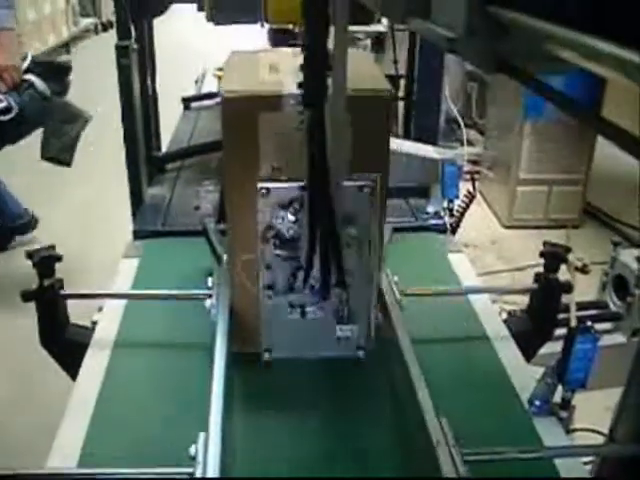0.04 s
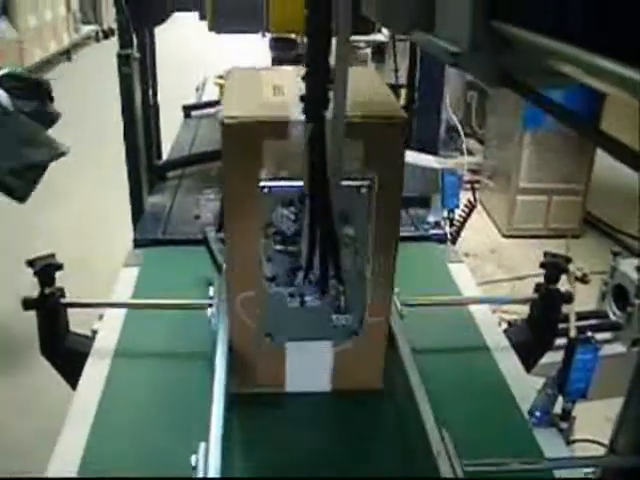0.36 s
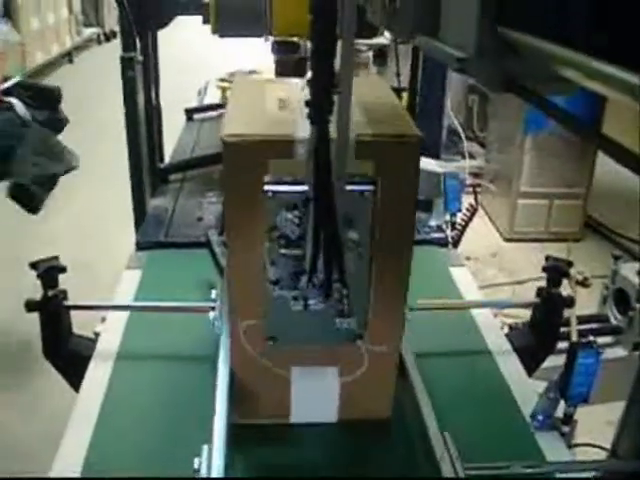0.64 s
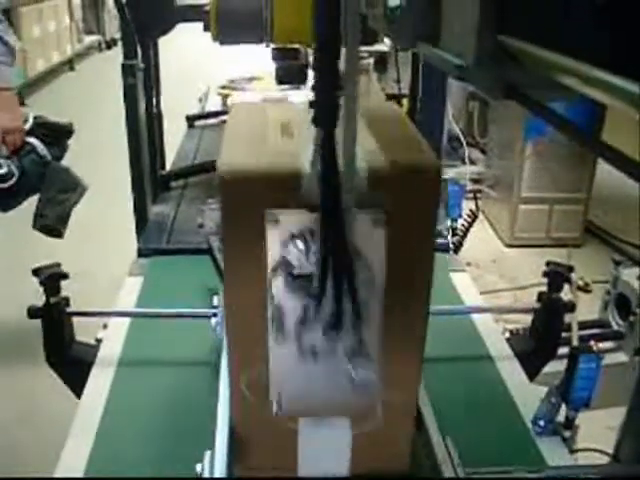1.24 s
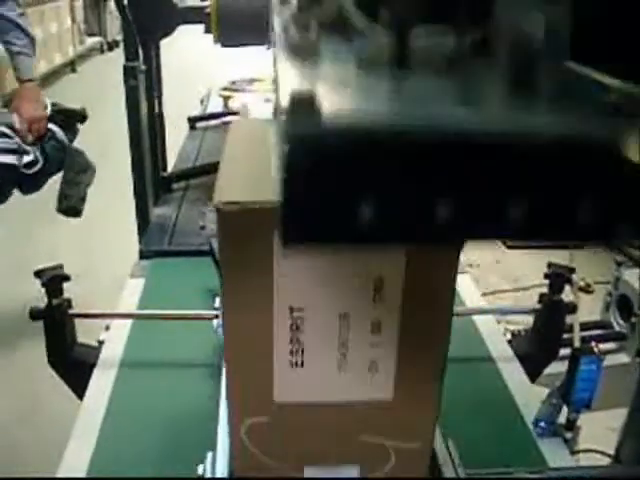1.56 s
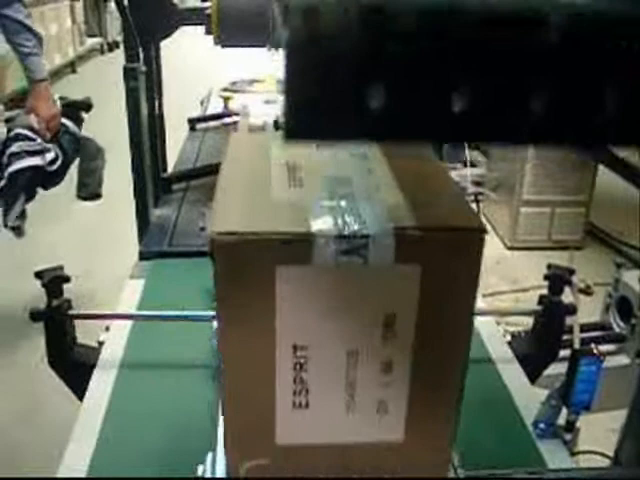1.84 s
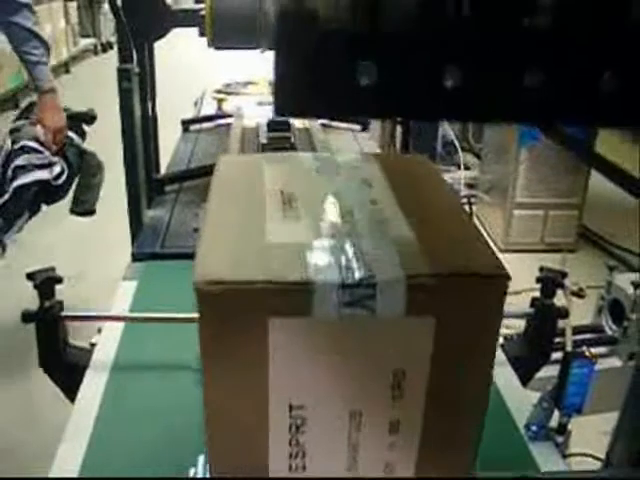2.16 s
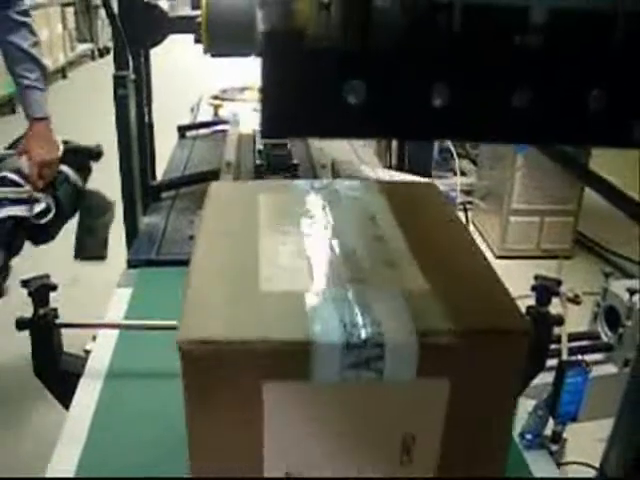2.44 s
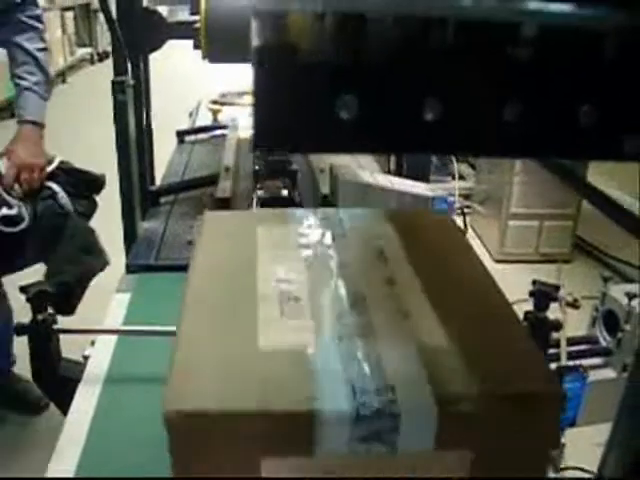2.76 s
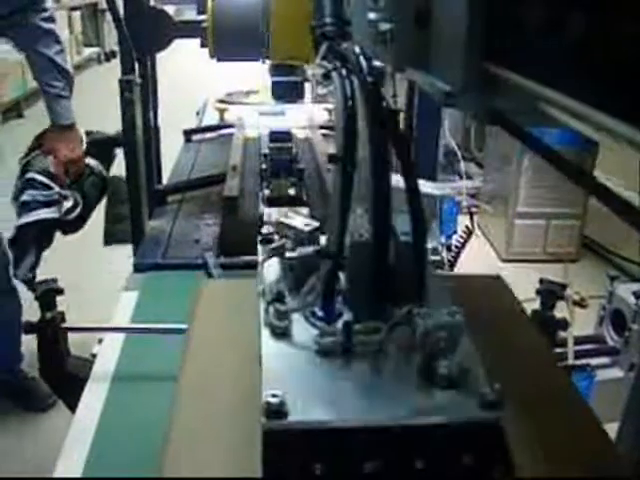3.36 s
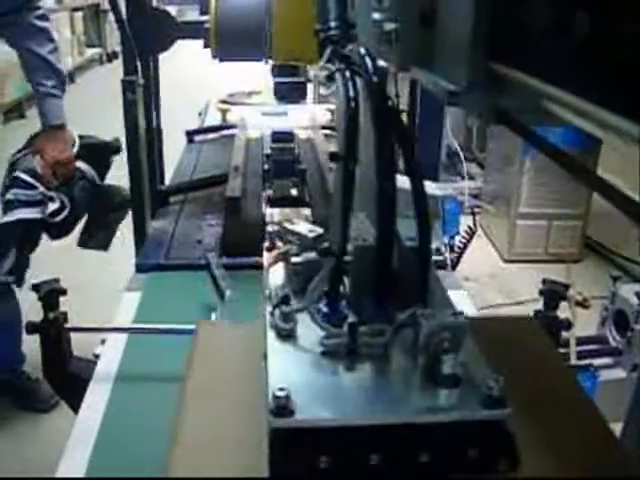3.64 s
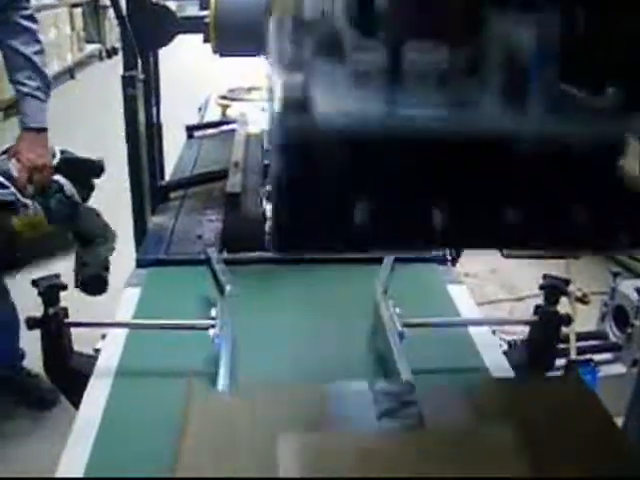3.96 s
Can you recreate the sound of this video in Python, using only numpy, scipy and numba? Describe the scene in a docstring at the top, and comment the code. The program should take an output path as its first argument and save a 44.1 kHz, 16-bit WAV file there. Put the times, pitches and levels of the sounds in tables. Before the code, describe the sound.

A pneumatic labeller clacks and fires a short air blast over a whirring conveyor. A longer hiss follows with a high motor whine, then a heavy knock, another blast and metallic clacks, sounding gritty through a small microphone.

```python
"""A conveyor whirrs and rumbles, carrying a carton past a pneumatic labeller. Twice the arm swings out,
knocks and blows a label on with a blast of turbulent air; each knock rings the modes of carton, frame and
metal stop. In between, an air jet hisses while the printer's stepper motor whines, feeding the next label.
The jets push down a small camera's gain control, and its coarse sampling adds a gritty treble."""
import sys
import numpy as np
from scipy import signal
from scipy.fft import rfft, irfft
from scipy.io import wavfile
from scipy.ndimage import uniform_filter1d
from numba import njit

SR = 44100
rng = np.random.default_rng(int(sys.argv[2]) if len(sys.argv) > 2 else 0)


def int16_out(signal):
    """Quantize to a 16-bit WAV file."""
    q = np.round(np.clip(np.atleast_2d(signal).T, -1, 1) * 32767)
    wavfile.write(sys.argv[1], SR, q.astype(np.int16))


N = 176400
T = np.arange(N) / SR
FREQS = np.maximum(np.arange(N // 2 + 1) * SR / N, 1)


# Label blasts. Each row: start and end in seconds, hiss and sizzle in dB, hiss tilt in dB per octave.
BLASTS = [(0.978, 1.182, -6.5, -6.5, 0), (3.617, 3.817, -4.5, -6, -2)]
# Spectra of the hiss and of the top-octave sizzle. Each row: frequency in Hz, relative level in dB.
BLAST_HISS = [(30, -24), (350, -26.5), (700, -32.5), (1100, -9.5), (1600, -11.5), (2050, 2), (2550, 3.5),
              (3400, 3), (4200, 7)]
SIZZLE = [(7000, -80), (10000, 0), (18000, 0)]
AIR_FLUTTER_DB = 0.57

def label_blasts(open_s=0.009, close_s=0.0088):
    """Turbulence radiates broadband noise while a valve is open, and decays once it shuts."""
    out = np.zeros(N)
    for start, end, hiss_db, sizzle_db, tilt_db in BLASTS:
        valve = np.clip((T - start) / open_s, 0, 1) * np.exp(-np.maximum(T - end, 0) / close_s)
        hiss = from_db(hiss_db) * noise(BLAST_HISS, tilt_db)
        out += valve * (hiss + from_db(sizzle_db) * noise(SIZZLE))
    return out * flutter(AIR_FLUTTER_DB)


# Jet that carries the fresh label under the pad. Each row: time in seconds, level in dB.
FEED_FLOW = [(1.828, -43), (1.833, -5.5), (2.1, 0.5), (2.4, -2), (2.74, -3), (2.79, -9.5), (2.83, -14.5),
             (2.9, -42)]
# Spectrum of its hiss. Each row: frequency in Hz, relative level in dB.
FEED_HISS = [(30, 2), (70, 3), (130, -1), (240, -7), (350, -12), (1050, -7.5), (1550, -11), (2100, -4),
             (2700, -3), (3500, 2), (4200, 2)]

def feed_jet():
    """Turbulent noise rises and falls with the flow of a softer jet buffeting the label."""
    hiss = from_db(-10.5) * noise(FEED_HISS) * flutter(AIR_FLUTTER_DB)
    sizzle = from_db(-9.5) * noise(SIZZLE)
    return airflow(FEED_FLOW) * (hiss + sizzle)


# Impacts of the arm and its valves. Each row: start in seconds, levels of carton thud, frame clack,
# metal ring and crack in dB, rattle time constant in seconds, hardness in dB per octave.
IMPACTS = [(0.837, -17.5, -33, -43, -40, 0.0034, 7.5), (.890, -36, -18.5, -22, -36, .004, -11),
           (0.9748, -23, 0.5, -9.5, -4, 0.0011, 10), (1.180, -5, -30, -30, -32, 0.0031, -7),
           (1.229, -22, -10.5, -19, -28, .005, 4.5), (1.4769, -24, -13.5, -21, -18.5, 0.0078, 4),
           (1.566, -30, -25, -7, -15, 0.0034, 0), (1.574, -29, -16, -18, -16, 0.0032, -3),
           (1.5815, -32, -10.5, -21, -18, .005, -10), (1.8279, -1, -7.5, -32, -9.5, 0.0019, -4.5),
           (2.761, -14, -6, -13, -11.5, 0.0037, -15), (2.814, -8, -7, -33, -29, 0.0039, -4),
           (2.9705, 0, -10.5, -16, -13, 0.004, 1), (3.3023, 10, 16.5, -13, -1, 0.0062, 1.5),
           (3.3073, 0, 2, -21, -4.5, .004, 11), (3.3247, -20, -5.5, -3.5, -4, .002, -2),
           (3.362, -17, -21, -20, -31, .002, 15), (3.6147, -3, 10, -0.5, -0.5, 0.0016, -8),
           (3.9081, -19, -2, 5.5, 3, 0.0025, 8.5), (3.9228, -18, -7.5, 10, 13.5, 0.0014, 5)]
# Modes of the struck parts. Each row: frequency in Hz, relative level in dB, T60 in seconds.
CARTON_MODES = [(98, -8.5, 0.065), (141, -2, 0.055), (269, -1, 0.024)]
FRAME_MODES = [(518, -2.5, 0.01), (736, -3, 0.015), (1060, -2, 0.012), (1360, -11, 0.0082),
               (1773, -7, 0.007)]
STOP_MODES = [(2176, -6, 0.01), (2476, 5, 0.0094), (2750, 0, 0.013), (3430, -3, 0.014),
              (3900, -2.5, 0.0026)]

def impacts(rattle_share=0.89):
    """An impulse excites damped modes in each part; frame and metal stop also rattle briefly."""
    out, age = np.zeros(N), T[:SR // 20]
    parts = (CARTON_MODES, 0), (FRAME_MODES, rattle_share / 2), (STOP_MODES, rattle_share)
    for part, (modes, rattle) in enumerate(parts):
        for k, (hz, db, t60) in enumerate(modes):
            force = np.zeros(N + SR)
            octaves = np.log2(hz / modes[1][0])  # harder blows favour the higher modes
            for start, *levels_db, _, rattle_s, hardness_db in IMPACTS:
                contact = rng.standard_normal(len(age)) * np.exp(-age / rattle_s)
                contact *= rattle / np.linalg.norm(contact)
                contact[0] += 1  # the impulse
                onset = int(start * SR)
                strength = from_db(levels_db[part] + hardness_db * octaves)
                force[onset:onset + len(age)] += strength * contact
            out += (-1) ** k * from_db(db) * damped_mode(force[:N], hz, t60)
    return out


def cracks():
    """Each abrupt contact radiates a dry burst of noise that decays exponentially."""
    envelope = sum((T >= start) * from_db(db) * np.exp(-np.abs(T - start) / rattle_s)
                   for start, *_, db, rattle_s, _ in IMPACTS)
    grit = butter(rng.standard_normal(N), 510, "high", order=1)
    grit = butter(grit, 4500, "low", order=4)
    return envelope * grit / grit.std()


# The printer's motor. Each row: time in seconds, step rate in Hz, level in dB.
STEPPER = [(2.03, 2040, -54), (2.07, 2048, -22), (2.11, 2020, -16), (2.58, 2023, -19.5), (2.61, 2032, -40),
           (2.76, 2020, -19), (2.8, 2080, -85)]

def stepper():
    """Periodic steps radiate a whine at the step rate and a subharmonic an octave below."""
    times, hz, db = np.transpose(STEPPER)
    phase = 2 * np.pi * np.cumsum(np.interp(T, times, hz)) / SR
    whine = from_db(np.interp(T, times, db)) * np.sin(phase) + from_db(-28) * np.sin(phase / 2)
    running = (T > times[0]) & (T < times[-1])
    return np.sqrt(2) * whine * running * flutter(depth_db=2.6)


def valve_squeak(start=1.567, end=1.589, hz=2680, width_hz=61, fade_db_per_s=450):
    """Escaping air drives a narrow resonance of an exhaust valve as the arm swings back."""
    level = from_db(-10.5 - fade_db_per_s * np.abs(T - start))
    whistle = np.tanh(2 * resonances([(hz, width_hz, 0)]))
    return ((T > start) & (T < end)) * level * whistle


def bracket_hum(start=1.585, hz=460, t60=0.29):
    """Free vibration: one mode of the arm's bracket dies away after the return stroke."""
    age = np.maximum(T - start, 0)
    return from_db(-22.5 - 60 * age / t60) * np.sin(2 * np.pi * hz * age)


# Air leaking round the pad as it rests over the carton. Each row: time in seconds, level in dB.
PAD_LEAK = [(3.31, -50), (3.34, -20), (3.38, -30), (3.41, -19.5), (3.5, -34), (3.61, -32), (3.63, -45)]

def pad_leak():
    """Turbulence in the leak makes a thin hiss before the second blast."""
    return airflow(PAD_LEAK) * noise(BLAST_HISS, tilt_db=15)


# Spectra of conveyor and fan whirr and of belt rumble. Each row: frequency in Hz, relative level in dB.
WHIRR = [(25, 0), (70, -4), (140, -7), (290, -7), (400, -6), (720, -2), (1000, -5.5), (1330, -8),
         (1550, -10), (2400, -7), (3100, -7.5), (4000, -6)]
RUMBLE = [(25, 0), (60, -1.5), (125, 0), (290, -4.5), (420, -9.5), (500, -4)]
# Resonances of machine and suction pad. Each row: frequency and width in Hz, relative level in dB.
DRONE = [(102.9, 4, -45), (263.4, 38, -40), (506.9, 8.2, -37.5), (570.3, 8, -34), (604.5, 28, -34),
         (639.8, 17, -32.5), (810.3, 14, -38.5), (910, 5.3, -42.5)]
SUCTION = [(745, 36, -40), (1150, 85, -36), (1330, 130, -36.5), (2155, 113, -35), (2682, 23, -53)]
# The running machine, whose pad sucks hardest while holding a label.
# Each row: time in seconds, gains of whirr, drone and suction in dB.
MACHINE_LEVELS = [(0, -0.5, 1.5, 1), (.96, 0, 1.5, 1), (1.05, 8, -3, -15), (1.3, 2, 2.5, -27),
                  (1.45, 0, 2, -10), (1.65, -5, 0, -10), (1.8, -2.5, 3, -9), (2.2, 5.5, 6.5, -3),
                  (2.9, 0.5, -1.5, 1), (3.1, 0, 0, -4), (3.27, 3, 3, 4.5), (3.6, 4.5, 3.5, 0.5),
                  (3.95, 1, -4.5, -20)]
# The belt under the carton. Each row: time in seconds, rumble level in dB.
RUMBLE_LEVEL = [(0, -44), (1.1, -35.5), (1.33, -24), (1.45, -39), (1.8, -35.5), (2.8, -35), (3.1, -47),
                (3.35, -26), (3.7, -45)]

def conveyor():
    """Broadband whirr and belt rumble underlie the noise-driven resonances of machine and pad."""
    times, *levels_db = np.transpose(MACHINE_LEVELS)
    layers = from_db(-27) * noise(WHIRR), resonances(DRONE), resonances(SUCTION)
    machine = sum(from_db(np.interp(T, times, db)) * layer for db, layer in zip(levels_db, layers))
    rumble_gain = from_db(np.interp(T, *np.transpose(RUMBLE_LEVEL)))
    return machine * flutter(depth_db=0.88) + rumble_gain * noise(RUMBLE)


def reflections(x, t60=0.1, level_db=-16):
    """Diffuse reflection from the surrounding machinery adds a short, decaying tail."""
    tail = butter(rng.standard_normal(SR // 2), 8000, "low", order=2)
    tail *= from_db(-60 * T[:SR // 2] / t60)
    return from_db(level_db) * signal.fftconvolve(x, tail / np.linalg.norm(tail))[:N]


def from_db(db):
    """Decibels to amplitude ratio."""
    return 10 ** (np.asarray(db) / 20)


def airflow(points):
    """An envelope through (seconds, dB) points, silent outside them."""
    return from_db(np.interp(T, *np.transpose(points), left=-np.inf, right=-np.inf))


def coloured(gain):
    """Spectral shaping: white noise weighted at each frequency, scaled to rms 1."""
    x = irfft(rfft(rng.standard_normal(N)) * gain, N)
    return x / x.std()


def noise(spectrum, tilt_db=0):
    """Noise through (Hz, dB) points, tilted per octave and rolled off above the last."""
    hz, db = np.transpose(spectrum)
    shape_db = np.interp(np.log(FREQS), np.log(hz), db) + tilt_db * np.log2(FREQS)
    return coloured(from_db(shape_db) / (1 + (FREQS / hz[-1]) ** 16))


def resonances(bands):
    """Random excitation of narrow resonances gives restless tones."""
    return sum(from_db(db) * coloured(1 / (1 + ((FREQS - hz) / width) ** 2 * 2))
               for hz, width, db in bands)


def flutter(depth_db, corner_hz=16):
    """Random amplitude modulation: a wavering gain."""
    return from_db(depth_db * coloured(1 / (1 + (FREQS / corner_hz) ** 2)))


def butter(x, hz, kind, order):
    """Butterworth filter."""
    return signal.sosfilt(signal.butter(order, hz, kind, fs=SR, output="sos"), x)


def damped_mode(force, hz, t60):
    """A damped oscillator answers a unit impulse with a sine decaying from height 1."""
    decay, angle = from_db(-60 / (t60 * SR)), 2 * np.pi * hz / SR
    return signal.lfilter([0, np.sin(angle)], [1, -2 * decay * np.cos(angle), decay ** 2], force + 1e-18)


@njit
def follow(wanted, attack, release):
    """First-order lag: the gain drops fast to the wanted value and creeps back."""
    gain, current = np.empty(len(wanted)), 1.0
    for i in range(len(wanted)):
        current += (wanted[i] - current) * (attack if wanted[i] < current else release)
        gain[i] = current
    return gain


def scene():
    """Superposition at one microphone; only the arm's sounds have a reflected tail."""
    arm = impacts() + cracks() + bracket_hum() + valve_squeak()
    return (conveyor() + label_blasts() + pad_leak() + feed_jet() + stepper() + arm + reflections(arm))[None]


THRESHOLD_DB, ATTACK_S, RELEASE_S, DETECTOR_HZ = -28.5, 0.0023, 0.62, 7560
ANTI_ALIAS_HZ, CEILING, HOLD_HZ, CUTOFF_HZ = 4300, 0.88, 8000, 15600

def record(dry):
    """Gain control ducks under the sizzle, peaks clip, and sample-and-hold adds spectral images."""
    treble = butter(dry[0], DETECTOR_HZ, "high", order=2)
    treble_rms = np.sqrt(np.abs(uniform_filter1d(treble ** 2, size=128)) + 1e-12)
    wanted = np.minimum(1, from_db(THRESHOLD_DB) / treble_rms)
    gain = follow(wanted, 1 / (ATTACK_S * SR), 1 / (RELEASE_S * SR))
    narrow = butter(dry[0] * gain, ANTI_ALIAS_HZ, "low", order=10)  # removes the sizzle itself
    clipped = np.clip(narrow, -CEILING, CEILING)
    held = np.interp(np.floor(T * HOLD_HZ) / HOLD_HZ, T, clipped)
    low_pass = signal.firwin(801, CUTOFF_HZ, fs=SR, window="blackman")
    return signal.fftconvolve(held, low_pass, "same")[None]


dry = scene()
out = record(dry)
int16_out(out)
```